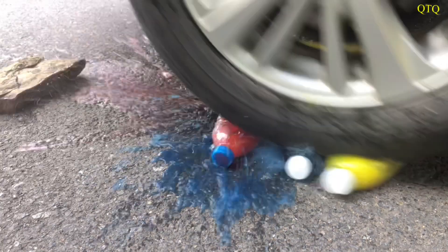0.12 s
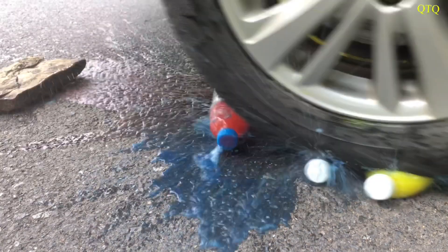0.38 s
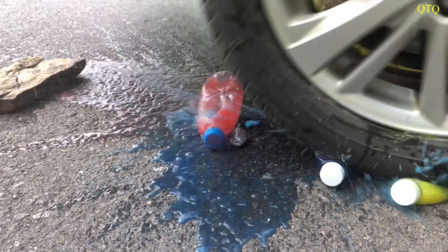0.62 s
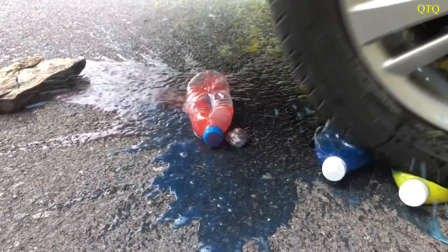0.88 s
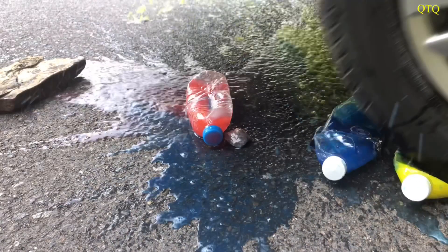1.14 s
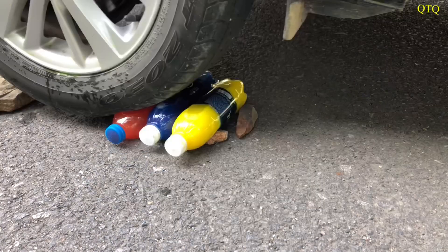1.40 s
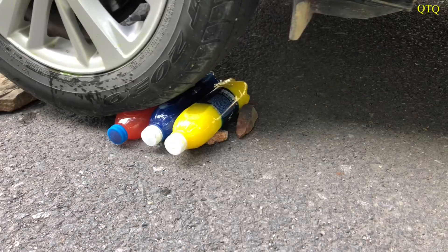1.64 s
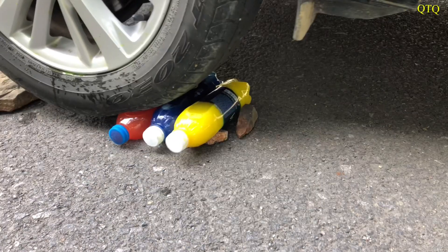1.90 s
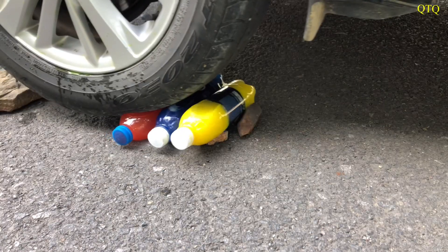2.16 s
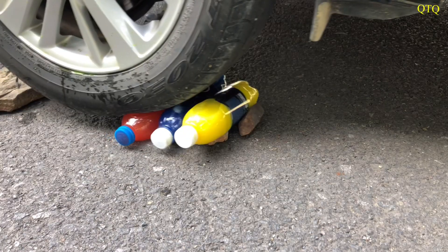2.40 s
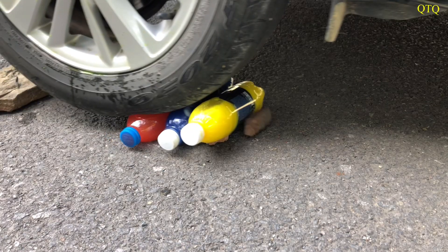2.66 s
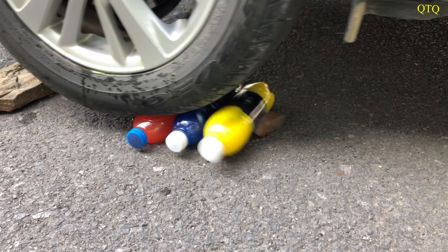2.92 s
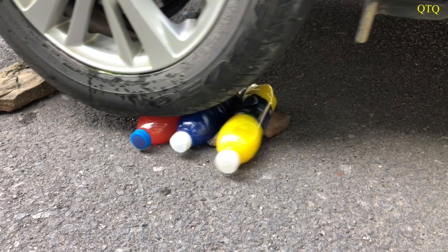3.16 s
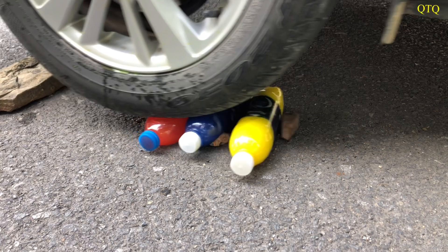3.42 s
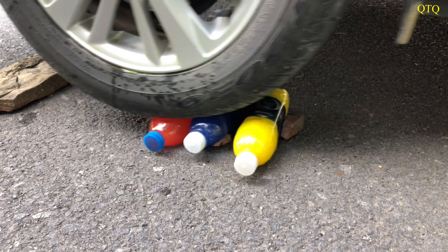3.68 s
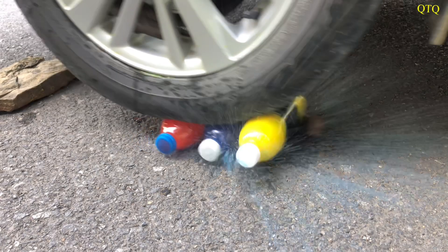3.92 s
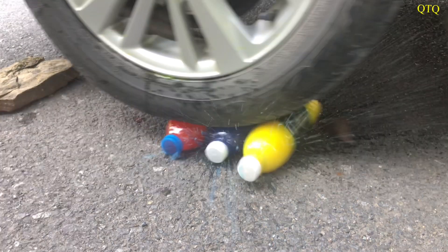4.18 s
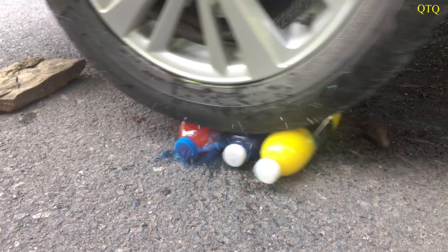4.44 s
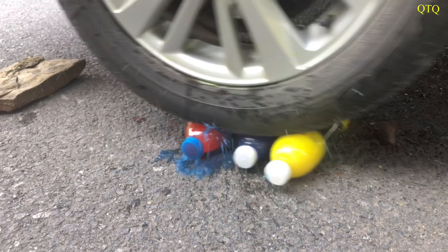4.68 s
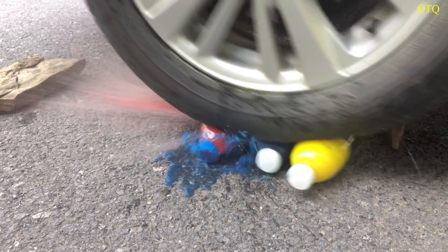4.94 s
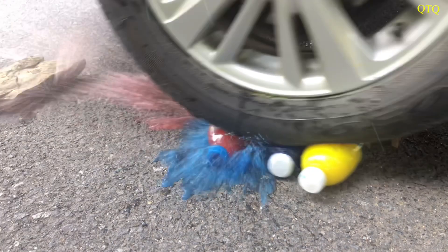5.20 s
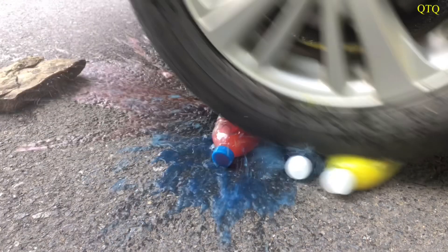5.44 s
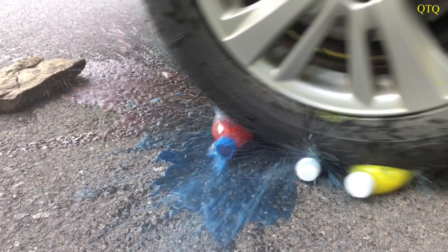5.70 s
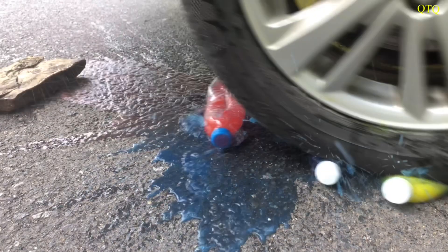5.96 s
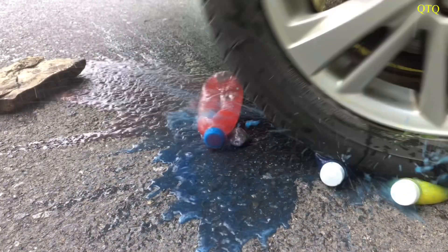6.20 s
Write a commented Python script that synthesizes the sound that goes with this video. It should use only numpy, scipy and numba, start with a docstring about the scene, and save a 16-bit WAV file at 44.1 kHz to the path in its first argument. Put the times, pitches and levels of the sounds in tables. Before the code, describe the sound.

Close outdoors, beside a tyre on asphalt. It opens abruptly at full level with a short, brighter wet rush of bursting bottles, cracks and spray. After a tiny gap the same crush plays slower and duller: a low throbbing idle, isolated plastic snaps and crinkles, then a loud burst with splashing, crackling, hissing jets and heavy drops hitting the microphone, cut off abruptly.

```python
"""A car tyre creeps over water-filled plastic bottles on asphalt, heard close by and played slowed down.
A short, faster pass opens with the end of the crush and goes on with fresh cracks, ticks and a drop.
After a brief silence comes the whole crush, slower and duller. Throughout, pulses ring an idling exhaust,
flickering noise bands make water, and gliding snaps with noisy tails make plastic crack, crinkle and knock;
later, noise swells as bottles burst, air puffs rumble, jets fizz, and chirping drops strike the microphone."""
import sys
import numpy as np
from scipy import signal
from scipy.fft import rfft, irfft
from scipy.io import wavfile
from scipy.ndimage import uniform_filter1d, map_coordinates
from numba import njit

SR = 44100
rng = np.random.default_rng(int(sys.argv[2]) if len(sys.argv) > 2 else 0)


def ratio_of_db(decibels):
    """Turn decibels (scalar or array-like) into linear amplitude factors; 0 dB maps to 1."""
    return 10 ** (np.asarray(decibels, float) / 20)


def put_to_file(sound):
    """Save the sound as 16-bit audio at rate SR, in the file named by the first command-line argument."""
    columns = np.atleast_2d(sound).T  # one column per channel
    safe = np.clip(columns, -1, 1)
    whole_steps = np.round(safe * 32767)
    wavfile.write(sys.argv[1], SR, whole_steps.astype(np.int16))


N = 279594

# The two passes. Each row: start in seconds, end in seconds, playback speed as a ratio to the slow pass.
PASSES = [(0, 1.172, 1.594), (1.199, 6.4, 1)]
# How hard the tyre works the bottles, water and grit. Each row: time in seconds, hiss level in dB.
ROLLING = [(.74, -42), (.97, -46.5), (1.172, -48.5), (1.2, -53), (2.9, -51), (3.05, -47), (3.3, -45.5),
           (3.68, -53), (3.85, -49), (3.99, -46), (4.25, -39), (4.8, -42), (4.97, -40), (5.06, -32),
           (5.43, -38), (5.54, -35), (6.34, -35)]


def unit(x):
    """Scale to rms 1."""
    return x / np.sqrt(np.mean(x ** 2))


@njit
def svf(x, hz, sharp):
    """State-variable band-pass with a moving centre; sharp is width over centre."""
    y, band, low = np.empty(len(x)), 0., 0.
    for i in range(len(x)):
        g = np.tan(np.pi * hz[i] / SR)
        v = (band + g * (x[i] - low)) / (1 + g * (g + sharp))
        band, low, y[i] = 2 * v - band, low + 2 * g * v, sharp * v
    return y


def svf_twice(x, hz, sharp, second_sharp):
    """Two band-passes in a row, for steeper skirts."""
    return svf(svf(x, hz, sharp), hz, second_sharp)


def walk(rate):
    """Random levels held for 1 / rate seconds and smoothed twice; rms 1."""
    hold = int(SR / rate)
    steps = np.repeat(rng.standard_normal(N // hold + 1), hold)
    return unit(uniform_filter1d(uniform_filter1d(steps, hold), hold)[:N])


def swell(time, s, db, rise_s, fade_s):
    """A level that climbs to its peak and dies away, straight in decibels; rise and fade are per 20 dB."""
    return ratio_of_db(db - 20 * np.maximum((s - time) / rise_s, (time - s) / fade_s))


def engine(time, speed):
    """Slow firings of uneven strength ring the exhaust; a rattle jumps up with each and sinks back; a drone joins."""
    # Engine at the slow speed. Each row: time in seconds, firings in Hz, thuds in dB,
    # gain of the drone under load in dB.
    idle = [(.7, 9.5, -46, -42), (1.17, 9.5, -49.5, -45), (1.199, 8.1, -33, -59), (1.7, 9.5, -32.5, -58.5),
            (3.1, 8.8, -32.5, -61.5), (3.951, 8.8, -29.5, -55), (4.4, 9.6, -39, -49), (4.9, 13, -42.5, -44),
            (5.3, 9.6, -41.5, -37.5), (6.34, 8.6, -41, -37)]
    # Exhaust resonances at the slow speed. Each row: centre in Hz, width in Hz, level in dB.
    exhaust = [(19, 10, -8.5), (37.8, 3.8, -2), (58.6, 17, -1.5), (109, 21, -12), (138, 30, -17),
               (168.3, 12, -12), (400, 160, -12.5)]
    rattle_db = -25.5  # against the thuds
    drone_hz = 60.0 * speed
    s, hz, thud_db, drone_db = np.transpose(idle)

    turns = np.cumsum(np.interp(time, s, hz) * speed / SR) + 0.91
    count = turns.astype(int)
    strength = ratio_of_db(1.3 * rng.standard_normal(count[-1] + 1))
    pulses = np.diff(count, prepend=count[0]) * strength[count]
    feed = unit(pulses) + .5 * rng.standard_normal(N)
    pipe = 0
    for k, (f, width, mode_db) in enumerate(exhaust):
        mode = unit(svf_twice(feed, f * speed, width / f, width / f))
        pipe = pipe + (-1) ** k * ratio_of_db(mode_db) * mode  # neighbours in opposite polarity

    after_firing = 0.74 + np.exp(-(turns % 1) / .3)
    rattle = after_firing * svf(rng.standard_normal(N), 1200 * speed, 0.83)
    thuds = unit(pipe) + ratio_of_db(rattle_db) * unit(rattle)

    rumble = unit(svf_twice(rng.standard_normal(N), drone_hz, 0.11, 0.11))
    hum = np.sin(2 * np.pi * np.cumsum(drone_hz * (1 + .015 * walk(3))) / SR)
    drone = .7 * rumble + .85 * hum
    return ratio_of_db(np.interp(time, s, thud_db)) * thuds + ratio_of_db(np.interp(time, s, drone_db)) * drone


def flickering_noise(colour, speed, grains_per_s, grain_db, flicker_db, flicker_per_s):
    """Uneven grains over smooth noise, in third-octave bands that surge together and flicker apart."""
    hz, db = np.transpose(colour)
    surge, out = walk(flicker_per_s), 0
    for f in hz[1] * 2 ** np.arange(0, np.log2(hz[-2] / hz[1]) + .2, 1 / 3):
        # every grain has its own pitch, so it sounds in one band only
        grains = unit(rng.standard_normal(N) * (rng.random(N) < grains_per_s / SR))
        source = rng.standard_normal(N) + ratio_of_db(grain_db) * grains
        flicker = flicker_db * (surge + 0.86 * walk(1.7 * flicker_per_s))
        level = ratio_of_db(np.interp(np.log(f), np.log(hz), db) + flicker)
        out = out + level * svf(source, f * speed, 0.29)
    return out / np.sqrt(speed * np.mean(out ** 2 / speed))


def water(time, speed):
    """Rolling and surging water: hissing spray of fine droplets above a lower, coarser slosh."""
    # Spray and slosh spectra at the slow speed. Each row: frequency in Hz, relative level in dB per Hz.
    hiss_colour = [(710, -32), (1200, -1.5), (1650, -6.5), (2320, 0.5), (2780, 2), (4070, 0.5),
                   (4500, -26.5), (5850, -40.5), (9900, -120)]
    slosh_colour = [(88, -31), (150, -3), (274, 2.5), (459, -2.5), (588, -4), (663, -2), (1600, -12.5),
                    (2080, -42), (3520, -120)]
    # Surges from the split bottles. Each row: peak in seconds, hiss in dB, rise in seconds per 20 dB,
    # fade in seconds per 20 dB, slosh over hiss in dB.
    surges = [(4.006, -10, .004, .02, -6), (4.05, -25.5, .07, .3, 8), (4.09, -23, .08, .07, 5),
              (4.14, -25, .04, .03, -2), (5.085, -20, .02, .28, 2), (5.212, -16, .13, .14, -1),
              (5.33, -27, .2, .08, 3), (5.582, -17, .02, .1, 3), (5.65, -17.5, .05, .25, 2),
              (5.76, -17, .17, .1, -3), (5.88, -20, .3, .5, -1), (5.985, -18, .04, .07, -2),
              (6.1, -21, .3, .15, -3), (6.22, -24, .05, .2, -1), (.74, -38, .1, .3, 5)]
    roll_db = np.interp(time, *np.transpose(ROLLING))
    # rolling slosh is -35 dB at a hiss of -45 dB and gains .62 dB per dB of hiss
    roll_slosh_db = -35 + .62 * (roll_db + 45)

    spray_power, wash_power = ratio_of_db(roll_db) ** 2, ratio_of_db(roll_slosh_db) ** 2
    for s, db, rise_s, fade_s, slosh_db in surges:
        jet = swell(time, s, db, rise_s, fade_s)
        spray_power = spray_power + jet ** 2
        wash_power = wash_power + (jet * ratio_of_db(slosh_db)) ** 2
    hiss = flickering_noise(hiss_colour, speed, grains_per_s=220, grain_db=-3.5,
                            flicker_db=1.5, flicker_per_s=60)
    slosh = flickering_noise(slosh_colour, speed, grains_per_s=50, grain_db=-3.5,
                             flicker_db=2.1, flicker_per_s=40)
    return np.sqrt(spray_power) * hiss + np.sqrt(wash_power) * slosh


def crackle(low_hz, high_hz, count, over_hiss_db):
    """Small snaps at random moments and pitches, louder the harder the tyre works: (s, peak dB, ring Hz)."""
    when, size, pitch = rng.random((count, 3)).T
    s = when * N / SR
    db = np.interp(s, *np.transpose(ROLLING)) + over_hiss_db - 2.2 * np.log(size)
    return list(zip(s, db, low_hz * (high_hz / low_hz) ** pitch))


def plastic(events, cycles, glide, sharp, grain_db, rise_s, t60):
    """A snap of a few cycles, falling in pitch, as a crease gives way; the wall crinkles on around that pitch."""
    out = np.zeros(N + SR)
    t = np.arange(SR // 6) / SR
    fade = (1 - np.exp(-t / rise_s)) * 1000. ** (-t / t60)
    for s, db, hz, crinkle_db in events:
        age = t * hz / cycles
        ring = np.sin(2 * np.pi * (hz * t - glide * cycles * np.exp(-3.0 * age)))
        snap = age ** 1.5 * np.exp(-2.5 * age ** 2) * ring
        grit = rng.standard_normal(len(t)) * ratio_of_db(grain_db * rng.exponential(size=len(t)))
        pitch = np.full(len(t), 1. * hz)
        crinkle = unit(svf_twice(grit, pitch, sharp, 1.4 * sharp)) * fade
        k = int(s * SR)
        out[k:k + len(t)] += ratio_of_db(db) * (snap / np.abs(snap).max() + ratio_of_db(crinkle_db) * crinkle)
    return out[:N]


def cracks():
    """Bottle walls buckle: mid-pitched snaps, the softer ones with relatively more crinkle."""
    # Planned cracks. Each row: start in seconds, peak in dB, ring in Hz.
    buckles = [(.755, -25.5, 550), (.774, -22, 649), (.832, -14, 810), (.854, -21, 569), (.889, -24.5, 579),
               (.994, -19.5, 457), (1.066, -24, 750), (1.085, -26, 700), (.864, -24, 750),
               (1.163, -26, 600), (1.122, -15.5, 598), (1.309, -31, 800), (1.327, -20, 912),
               (1.333, -24, 1050), (1.345, -26, 1000), (1.352, -26, 500), (1.7472, -1.5, 920),
               (1.763, -21, 1070), (1.7665, -23, 1050), (1.857, -22, 900), (1.862, -22, 1080),
               (1.868, -22, 1040), (1.874, -25, 700), (2.049, -26, 1050), (2.058, -23, 750),
               (2.063, -22, 680), (2.114, -19, 740), (2.121, -24, 800), (2.131, -23, 1305),
               (2.137, -26, 620), (2.321, -24.5, 1030), (2.371, -17, 769), (2.472, -27, 560),
               (2.4936, -4.5, 892), (2.502, -20, 800), (2.508, -21, 750), (2.516, -23, 1050),
               (2.613, -16.5, 754), (2.63, -24, 750), (2.694, -16, 680), (2.698, -21, 520),
               (2.823, -25, 615), (2.905, -18.5, 680), (3.102, -7.5, 702), (3.111, -14, 620),
               (3.118, -14, 900), (3.123, -17, 700), (3.127, -15, 640), (3.136, -20, 800),
               (3.144, -20, 720), (3.265, -25.5, 660), (3.329, -24.5, 781), (3.383, -27, 1000),
               (3.399, -25, 800), (3.454, -19.5, 694), (3.457, -25, 1250), (3.666, -27, 700),
               (3.568, -25, 480), (3.629, -20.5, 1190), (3.926, -20.5, 905), (4.005, -5, 760),
               (4.01, -10, 600), (4.02, -11, 800), (4.025, -6, 885), (4.039, -10, 800), (4.058, -12, 600),
               (4.073, -7, 880), (4.086, -9, 900), (4.093, -10, 850), (4.099, -10, 600), (4.112, -11, 600),
               (4.306, -20, 620), (4.326, -15.5, 1030), (4.347, -14.5, 1014), (4.42, -22, 452),
               (4.425, -22, 1350), (4.502, -14, 520), (4.508, -16, 900), (4.5255, -15.5, 1480),
               (4.545, -17, 795), (4.568, -19, 500), (4.605, -20.5, 470), (4.63, -19, 1400),
               (4.637, -20, 850), (4.695, -23, 800), (4.728, -22, 1000), (4.7322, -9.5, 1109),
               (4.85, -16.5, 1350), (4.888, -21, 900), (4.966, -23, 629), (5.08, -11, 934),
               (5.095, -13, 700), (5.105, -10, 600), (5.133, -14, 450), (5.183, -11, 800),
               (5.192, -12, 400), (5.217, -10, 1400), (5.328, -14, 950), (5.15, -16, 686),
               (5.282, -14.5, 1194), (5.38, -16.5, 553), (5.491, -18.5, 520), (5.548, -13, 966),
               (5.553, -14, 1150), (5.56, -17, 1000), (5.569, -14, 1300), (5.577, -5, 1244),
               (5.981, -9.5, 514), (6.217, -11, 1256), (6.287, -18, 582), (6.299, -17, 700),
               (6.316, -19, 450)]
    snaps = buckles + crackle(450, 1300, count=40, over_hiss_db=9.5)
    # crinkle in dB against its snap
    events = [(s, db, hz, -13 - .55 * (db + 18)) for s, db, hz in snaps]
    return plastic(events, cycles=2.3, glide=.13, sharp=0.6, grain_db=3.0, rise_s=0.003, t60=0.15)


def ticks():
    """Splitting plastic, grit and splashes: bright, short snaps."""
    # Planned ticks. Each row: start in seconds, peak in dB, ring in Hz, crinkle against the snap in dB.
    splits = [(.8034, -18, 2120, -12), (.805, -23, 5000, -10), (.8325, -20, 5700, -8),
              (.839, -21, 2200, -6), (.8555, -25, 5000, -8), (.893, -26, 5000, -6), (.998, -20, 2400, -8),
              (1.0275, -28, 5200, -8), (1.049, -29, 6000, -8), (1.0595, -26, 5000, -6),
              (1.089, -29, 2200, -5), (1.122, -25, 4500, -5), (1.139, -28, 3000, -5),
              (.832, -9.5, 3285, -10), (.854, -22, 2220, -14), (.8927, -20.5, 2216, -4),
              (.9976, -15, 5100, -15), (1.0263, -22.5, 2760, -5), (1.059, -22, 2900, -3),
              (1.1216, -24, 1950, 0), (1.308, -35, 2400, 0), (1.3262, -26, 2100, -3), (1.74, -34, 2200, 0),
              (1.7468, -20, 1900, -12), (1.8542, -23.5, 2290, -6), (1.86, -30, 1800, 0),
              (1.868, -27, 2300, -4), (1.874, -28, 1500, -2), (1.9982, -22, 2300, -6),
              (1.9986, -23, 3500, -5), (2.051, -35, 4200, 0), (2.071, -30, 2100, -6),
              (2.073, -28, 3900, -4), (2.116, -31, 1700, 0), (2.121, -34, 3000, 0),
              (2.3707, -23, 1840, -8.5), (2.467, -31, 2300, -3), (2.476, -31, 1700, -2),
              (2.487, -22, 2100, -3), (2.4895, -14, 3000, -8), (2.493, -17, 2000, -5),
              (2.5466, -34, 3300, 0), (2.613, -24, 1800, -8), (2.624, -21, 1750, -8),
              (2.623, -28, 2900, -8), (2.649, -29, 3700, -4), (2.863, -26, 2640, 0), (3.096, -22, 2000, 0),
              (3.0985, -16, 2386, -1), (3.101, -17, 3900, -6), (3.103, -16, 1600, -4),
              (3.1104, -15.5, 2450, 0), (3.113, -19, 4000, -6), (3.119, -20, 1700, -2),
              (3.13, -22, 1600, -2), (3.146, -27, 1300, 0), (3.2639, -23, 2680, -6.5),
              (3.3101, -20.5, 4290, -9.5), (3.3105, -28, 2200, -6), (3.3286, -20, 4170, -9),
              (3.329, -24, 2500, -8), (3.346, -26, 3800, -8), (3.381, -27, 4000, -3),
              (3.3459, -23, 2530, -5.5), (3.5288, -30, 2395, -2.5), (3.529, -31, 3700, -4),
              (3.572, -28, 2010, -3), (3.574, -29, 3400, -1), (3.6306, -28.5, 3340, -5.5),
              (3.8375, -27, 3350, -3.5), (3.9764, -17, 3770, -14), (3.9962, -13, 2575, -4),
              (4.0033, -6, 3530, -10), (4.0057, .5, 3000, -16), (4.0085, -6, 2400, -12),
              (4.011, -8, 3900, -12), (4.013, -6, 2600, -20), (4.025, -11, 2300, -10),
              (4.046, -14, 2200, -6), (4.054, -11, 2000, -10), (4.116, -1, 3470, -18),
              (4.1162, -8, 1900, -12), (4.1185, -8, 2800, -10), (4.134, -17, 3400, -6),
              (4.139, -15, 2600, -8), (4.1435, -16, 3200, -10), (4.157, 2, 4400, -16.5),
              (4.1575, -4, 2900, -20), (4.2413, -15.5, 3905, -9), (4.2612, -19, 2340, -3),
              (4.2615, -20, 4000, -4), (4.27, -21, 3600, -2), (4.326, -20, 2110, -6),
              (4.345, -24, 2300, -6), (4.418, -24, 3800, -3), (4.432, -24, 3600, -4),
              (4.4584, -20.5, 2840, -2), (4.459, -22, 3900, -2), (4.476, -23, 2300, -6),
              (4.497, -22, 3400, -6), (4.4995, -19, 2200, -3), (4.545, -21, 1800, -6),
              (4.546, -6, 3850, -18), (4.559, -23, 3500, -6), (4.596, -21, 2620, -6.5),
              (4.6295, -22, 2440, -8), (4.655, -19, 3800, -3), (4.6552, -21, 2500, -10),
              (4.67, -25, 3700, -6), (4.6798, -22.5, 3090, -9), (4.714, -18, 2930, -10.5),
              (4.7336, -19.5, 2290, -6), (4.8497, -5.5, 3510, -16.5), (4.9467, -19, 2800, -8),
              (5.1503, -15, 3130, -10), (5.176, -15, 3000, -6), (5.3475, -18, 2016, -6),
              (5.349, -17, 3400, -8), (5.5502, -19.5, 3010, -8), (5.58, -5, 2450, -10),
              (5.582, -8, 1400, -6), (5.62, -12, 3000, -6), (5.779, -9, 2200, -10), (5.9795, -7, 3880, -6),
              (5.993, -9, 3300, -6), (6.1, -13, 2400, -6), (6.1559, -6, 3800, -20)]
    small = [(*row, -8.0) for row in crackle(1800, 4200, count=90, over_hiss_db=3.5)]
    return plastic(splits + small, cycles=3.5, glide=.05, sharp=.9, grain_db=3.0, rise_s=0.002, t60=0.045)


def drops(time, speed):
    """Drops slap, then shake the membrane in a falling chirp; each film briefly dulls the water and plastic."""
    # Drops on the microphone. Each row: time in seconds, thump in dB, slap in dB, contact in seconds,
    # level change of the blocked sounds in dB.
    strikes = [(.8045, -12, -16, .0014, -3), (4.1575, -13, 3, .0032, -20), (5.581, -10, -20, .0022, 0),
               (6.1573, -6, -9, .0022, -1)]
    # The wet membrane swings slowly back: start in seconds, level in dB, pitch in Hz, T60 in seconds.
    heave = (4.2, -8, 13, .5)
    slap_hz, slap_s = 2100, .0004
    thump_t60_s, blocked_s = .12, .043  # at the slow speed
    thumps, clear = np.zeros(N), np.ones(N)
    for s, db, slap_db, contact_s, blocked_db in strikes:
        t = np.maximum(time - s, 0)
        # every cycle lasts twice as long as the one before
        chirp = np.sin(2 * np.pi * np.log2(1 + t / contact_s))
        thumps += ratio_of_db(db) * chirp * 1000. ** (-t * speed / thump_t60_s)
        slap = np.cos(2 * np.pi * slap_hz * (time - s)) * np.exp(-((time - s) / slap_s) ** 2)
        thumps += ratio_of_db(slap_db) * slap
        clear[(t > .002) & (t * speed < blocked_s)] *= ratio_of_db(blocked_db)
    s, db, hz, t60 = heave
    t = np.maximum(time - s, 0)
    thumps += ratio_of_db(db) * np.sin(2 * np.pi * hz * t) * 1000. ** (-t / t60)
    return thumps, uniform_filter1d(clear, size=100)


def knocks():
    """Whole bottles shift: hollow, low snaps with a narrow tail."""
    # Each row: start in seconds, peak in dB, ring in Hz.
    shifts = [(1.325, -20.5, 322), (1.342, -25, 300), (2.495, -31, 176), (2.624, -31, 186),
              (3.118, -21, 278.6), (3.128, -20, 200), (3.15, -24, 150), (3.178, -28, 220), (3.37, -25, 150),
              (3.418, -27, 218.4), (4.495, -20, 257), (3.1, -23, 60), (4.017, -19, 300), (4.04, -15, 36),
              (4.5, -20, 330), (4.962, -20, 220), (4.98, -22, 205.6), (4.995, -21, 190), (5.6, -15, 200),
              (5.65, -14, 230), (5.69, -16, 200), (5.73, -16, 250), (5.805, -20, 480),
              (5.094, -16.5, 174.2)]
    events = [(*row, -4) for row in shifts]  # crinkle in dB against the snap
    return plastic(events, cycles=4.0, glide=.03, sharp=.3, grain_db=2.0, rise_s=.008, t60=0.2)


def gusts(time, speed):
    """Puffs of air buffet the microphone: deep flickering noise that rises fast and fades."""
    # Rumble spectrum at the slow speed. Each row: frequency in Hz, relative level in dB per Hz.
    colour = [(12, -30), (20, 0.5), (42, -1), (86, -10.5), (130, -7.5), (170, -38.5), (290, -120)]
    # Each row: peak in seconds, level in dB, fade in seconds per 20 dB.
    puffs = [(3.12, -24, .2), (3.35, -35, .3), (4.01, -24, .5), (4.07, -13, .12), (4.22, -31, .25),
             (5.1, -21, .5), (5.2, -25, .3), (5.59, -15, .2), (5.68, -17, .2), (5.81, -19, .3),
             (5.98, -18, .25), (6.17, -26, .4)]
    push = np.sqrt(sum(swell(time, s, db, .03, fade_s) ** 2 for s, db, fade_s in puffs))
    return push * flickering_noise(colour, speed, grains_per_s=30, grain_db=-14.5,
                                   flicker_db=2.5, flicker_per_s=23)


def fizz(time):
    """Narrow jets through a split: spitting noise in the band that each split favours."""
    # Each row: peak in seconds, level in dB, rise and fade in seconds per 20 dB, centre in Hz.
    jets = [(4.03, -20, .02, .015, 3600), (5.215, -20, .05, .06, 3000), (5.66, -20, .06, .06, 3000),
            (5.755, -14, .1, .06, 3600), (5.97, -20, .06, .05, 3700)]
    out = 0
    for s, db, rise_s, fade_s, hz in jets:
        spit = rng.standard_normal(N) * ratio_of_db(3.0 * walk(150))
        out = out + swell(time, s, db, rise_s, fade_s) * unit(svf(spit, np.full(N, 1. * hz), .45))
    return out


def scene():
    """Engine, water, plastic, air and the drops on the microphone."""
    time = np.arange(N) / SR
    speed = np.where(time < PASSES[0][1], PASSES[0][2], PASSES[1][2]) * 1.
    thumps, clear = drops(time, speed)
    bottles = cracks() + ticks() + knocks()
    blockable = water(time, speed) + fizz(time) + bottles
    return (engine(time, speed) + clear * blockable + thumps + gusts(time, speed))[None]


def open_with_the_end(x, time):
    """The fast pass opens with the end of the slow one, sped up and a little quieter."""
    from_s, until_s, replay_db = 5.1571, .735, -4.9
    replay = map_coordinates(x[0], [(from_s + PASSES[0][2] * time) * SR], mode="mirror")
    share = np.clip((until_s - time) / .01, 0, 1)  # 10 ms equal-power crossfade
    return np.sqrt(share) * ratio_of_db(replay_db) * replay + np.sqrt(1 - share) * x


def slow_down(x, time):
    """Slowing lowers the top edge and leaves faint mirrors of it and of the bass, higher up."""
    top_hz = 4610  # at the slow speed
    hz = np.fft.rfftfreq(N, 1 / SR)
    out = np.zeros_like(x)
    for start, end, speed in PASSES:
        slowed = irfft(rfft(x) * (hz < top_hz * speed) * (hz > 12), N)
        mirror = rfft(slowed * np.cos(2 * np.pi * SR / 4 * speed * time))
        near_edge = np.abs(hz / speed - 6550) < 250
        near_bass = (np.abs(hz / speed - SR / 4) < 300) * (hz < 15700)
        slowed = slowed + irfft(mirror * (ratio_of_db(-33.0) * near_edge + ratio_of_db(-58.0) * near_bass), N)
        # 6 ms fades, except that the sound starts at full level
        since_start = time - start + .006 * (start == 0)
        out += slowed * np.clip(np.minimum(since_start, end - time) / .006, 0, 1)
    return out


def low_pass(x):
    """Removes everything above the highest recorded frequency."""
    return signal.sosfilt(signal.butter(12, 15700, fs=SR, output="sos"), x)


def record(dry):
    """The microphone rounds big swings, both passes are slowed, and the loudest peaks are cut flat."""
    time = np.arange(N) / SR
    rounded = 1.148 * np.tanh(dry / 1.155)
    slowed = slow_down(open_with_the_end(rounded, time), time)
    mix = np.clip(slowed, -1, 1)
    return low_pass(mix)


dry = scene()
out = record(dry)
put_to_file(out)
```